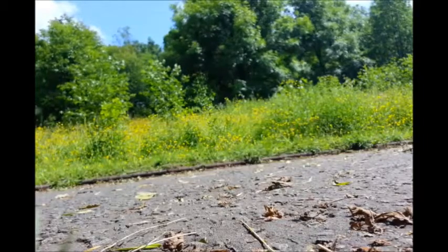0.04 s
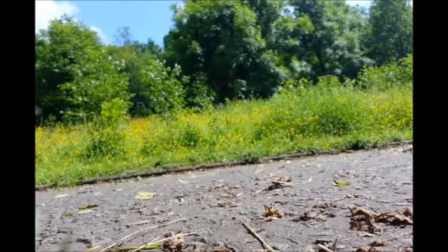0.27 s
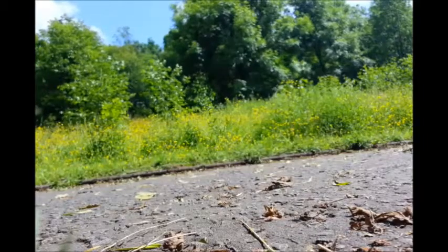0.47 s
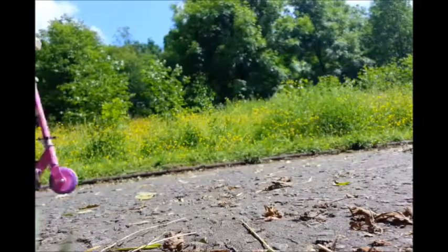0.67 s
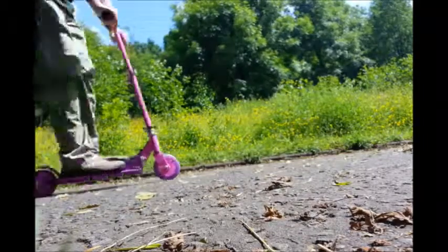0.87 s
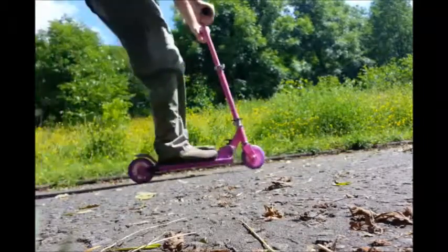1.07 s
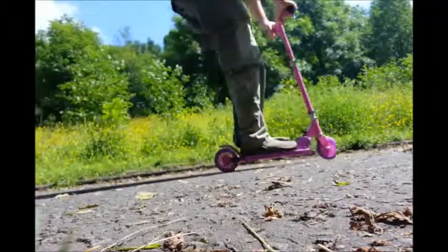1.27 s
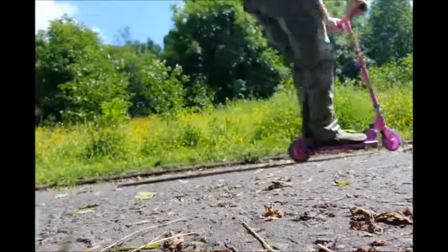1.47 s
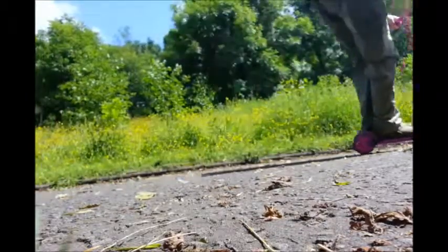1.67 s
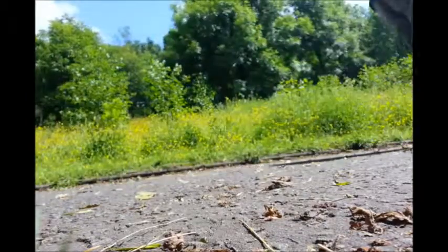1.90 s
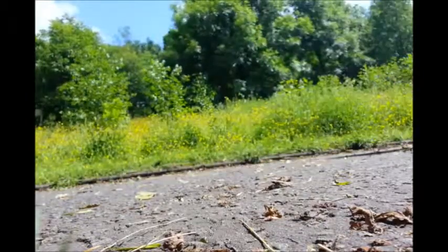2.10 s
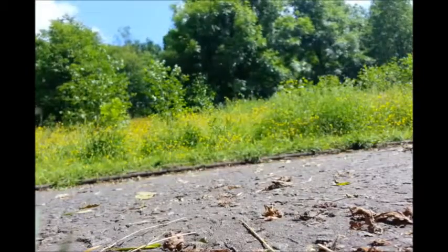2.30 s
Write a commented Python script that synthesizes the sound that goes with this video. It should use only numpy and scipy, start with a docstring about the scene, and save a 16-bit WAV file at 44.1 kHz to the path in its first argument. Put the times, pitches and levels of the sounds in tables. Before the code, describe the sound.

A kick scooter rolls by close, its wheels crackling over grit and its loose frame clattering.

```python
"""A kick scooter rolls past, right to left, on rough asphalt, close to a microphone pair near the ground. Its
small hard wheels rumble, crunch through patches of grit and jolt over stones. Each jolt makes the loose frame
clack, the deck ring and the wheels thud; some strong jolts add a hollow knock of the loose steering joint.
Faint open-air noise lies behind."""
import sys
import numpy as np
from scipy import signal
from scipy.fft import rfft, irfft, next_fast_len
from scipy.io import wavfile
from scipy.ndimage import uniform_filter1d, map_coordinates

SR = 44100
rng = np.random.default_rng(int(sys.argv[2]) if len(sys.argv) > 2 else 0)


def transcribe(signal):
    """Save signal, clipped to [-1, 1], as a 16-bit WAV file at the path in sys.argv[1]."""
    frames = np.atleast_2d(signal).T
    limited = np.clip(frames, -1, 1)
    pcm = np.round(limited * 32767).astype(np.int16)
    wavfile.write(sys.argv[1], SR, pcm)


N = 108045
TIME_S, FFT_SIZE = np.arange(N) / SR, next_fast_len(N + 8192, True)
FREQS_HZ = np.maximum(np.arange(FFT_SIZE // 2 + 1) * SR / FFT_SIZE, 1)
IMPACT_RISE_S = 0.0007

# jolts over stones: start_s, clack_db, deck_db, thud_db, ping_hz
JOLTS = [(0.1734, -11.5, -32, -47, 4240), (0.2672, -16, -42, -40, 6120), (0.3876, -7.5, -37, -21, 7750),
         (0.5461, -15, -31, -25.5, 6500), (0.591, -5, -22, -29, 6120), (0.6646, -7, -47, -40, 5850),
         (0.6918, -8, -47, -41, 6210), (0.74, -8.5, -25, -47, 7080), (0.7858, -2, -23, -33, 6030),
         (0.8156, -4.5, -30, -26.5, 6220), (0.878, -12, -27, -48, 7800), (0.8994, -7, -22, -28.5, 3100),
         (0.9113, -4.5, -24.5, -37, 3120), (0.9444, -8, -46, -32, 7150), (0.9863, -14, -20.5, -38, 5300),
         (0.9946, -3.5, -25, -35, 5230), (1, -8, -24, -51, 5300), (1.0088, -14, -27, -47, 7000),
         (1.026, -15, -43, -42, 5060), (1.0441, -11, -40, -32, 5570), (1.07, -3, -22, -22, 6240),
         (1.0834, -7.5, -22, -37, 5000), (1.1178, -4.5, -28, -28, 6540), (1.1408, -7, -31, -33, 7200),
         (1.154, -10.5, -28, -35, 6630), (1.1973, -4.5, -26.5, -28, 6530), (1.2156, -11.5, -27, -27, 6360),
         (1.2311, -8, -29.5, -32, 4600), (1.276, -9, -25.5, -36, 6570), (1.3412, -15, -25.5, -32.5, 3700),
         (1.3871, -20, -24.5, -33, 5440), (1.4306, -10, -30, -30, 4040), (1.445, -12, -34, -26.5, 5200),
         (1.4562, -8, -44, -27, 6500), (1.4716, -7.5, -31, -33, 6780), (1.5345, -2.5, -24.5, -19, 6770),
         (1.5562, -8.5, -22.5, -43, 3560), (1.6207, -2, -37, -32, 6800), (1.7107, -12.5, -27.5, -30, 6730),
         (1.7851, -9, -46, -31, 6230), (1.8708, -15.5, -55, -43, 4340), (1.8993, -2, -48, -24.5, 5930),
         (1.962, -13.5, -40, -48, 5600), (1.9847, -12.5, -35.5, -36, 4450), (2.0871, -17, -38, -38, 4620),
         (2.1498, -14.5, -33, -50, 4160), (2.2477, -15, -45, -39, 4010), (2.364, -19.5, -48, -36.5, 4150),
         (2.4238, -25, -56, -42, 4020)]
# clack and knock spectrum: freq_hz, gain_db
CLACK_COLOUR = [(900, -14), (2000, 1.5), (3000, 2), (4400, 1), (5800, 4), (7100, -1), (8600, -2),
                (10500, -5), (12000, -12), (14500, -14.5), (16000, -61)]
# crushed sand spectrum: freq_hz, gain_db
SAND_COLOUR = [(3000, -6), (7000, -4), (10000, 0), (12000, -3.5), (14500, -10.5), (16000, -68)]


def from_db(db):
    """Decibels to gain."""
    return 10 ** (np.asarray(db) / 20)


def unit_rms(x):
    """Scale to rms 1."""
    return x / np.sqrt(np.mean(x ** 2) + 1e-20)


def in_time(rows):
    """Value columns of a time curve at every sample."""
    time_s, *columns = np.transpose(rows)
    return [np.interp(TIME_S, time_s, column) for column in columns]


def at_hz(points):
    """Spectrum at every FFT bin."""
    hz, value = np.transpose(points)
    return np.interp(np.log(FREQS_HZ), np.log(hz), value)


def through(x, response):
    """Filter by a frequency response."""
    return irfft(rfft(x, FFT_SIZE) * response, FFT_SIZE)[..., :N]


def minimum_phase(colour):
    """Causal response of a colour, unit power gain."""
    gain = unit_rms(from_db(at_hz(colour)))
    cepstrum = irfft(np.log(gain), FFT_SIZE)
    cepstrum[1:FFT_SIZE // 2] *= 2
    cepstrum[FFT_SIZE // 2 + 1:] = 0
    return np.exp(rfft(cepstrum))


def decay(kicks, decay_s):
    """Exponential tail on each kick."""
    return signal.lfilter([1], [1, -np.exp(-1 / (decay_s * SR))], kicks + 1e-18)


def ring(x, hz, t60_s):
    """One damped mode."""
    radius, angle = from_db(-60 / (t60_s * SR)), 2 * np.pi * hz / SR
    return signal.lfilter([np.sin(angle)], [1, -2 * radius * np.cos(angle), radius ** 2], x + 1e-18)


def steady(x, window_samples):
    """Hold the running rms at 1."""
    return x / np.sqrt(uniform_filter1d(x ** 2, window_samples, axis=-1) + 1e-9)


def grains(per_s, spread_db, decay_s):
    """Tiny random impacts as noise bursts: (common, left, right), rms 1."""
    sizes = from_db(spread_db * np.minimum(rng.exponential(1, N), 3.5))
    power = sizes ** 2 * (rng.random(N) < per_s / SR)
    bursts = np.sqrt(decay(power, decay_s)) * rng.standard_normal((3, N))
    return steady(bursts, window_samples=800)


def jolt_kicks(column, gain_db):
    """One impulse per jolt, sized by the named level column."""
    start_s, clack_db, deck_db, thud_db, _ = np.transpose(JOLTS)
    level_db = {"clack": clack_db, "deck": deck_db, "thud": thud_db}[column]
    kicks = np.zeros(N)
    np.add.at(kicks, (start_s * SR).astype(int), from_db(level_db + gain_db))
    return kicks


def microphones(sound, colour):
    """Colour (common, left, right) into stereo; lag and shading follow the scooter's direction."""
    # direction: time_s, left_lag_ms, treble_left_minus_right_db
    path = [(0, 0.42, -3), (.4, 0.38, -4.5), (.7, 0.31, -4.5), (.95, 0.22, -1), (1.22, 0.071, -3),
            (1.5, -0.12, 0.5), (1.9, -0.21, 0), (2.45, -0.33, 2.5)]
    # left-right likeness: freq_hz, common_power_share
    likeness = [(30, 0.52), (100, 0.96), (300, 1), (800, 0.81), (1600, 0.75), (2800, 0.7), (4500, 0.26),
                (7000, 0.12), (14000, 0.19)]
    # static balance: freq_hz, left_minus_right_db
    balance = [(60, -3.5), (150, -3), (350, -0.5), (800, 0), (1600, 4), (2800, 5.5), (4300, 6.5), (5500, 4),
               (7000, -9.5), (10000, -5.5), (14000, -8)]
    # depth of directional shading: freq_hz, share
    swing = [(100, 0.11), (1000, 0.091), (3000, 1), (7000, 1), (12000, 0.31)]
    lag_ms, pan_db = in_time(path)
    share, response = np.clip(at_hz(likeness), 0, 0.99), minimum_phase(colour)
    sides = np.array([[1], [-1]])
    common = through(sound[0], response * np.sqrt(share))
    shift_samples = lag_ms / 1000 * SR / 2
    pair = np.array([map_coordinates(common, [np.arange(N) - side * shift_samples]) for side in (1, -1)])
    pair += through(sound[1:], response * np.sqrt(1 - share))
    pair = through(pair, from_db(sides * at_hz(balance) / 2))
    return pair + through(pair, at_hz(swing)) * (from_db(sides * pan_db / 2) - 1)


def pebbles(per_s=520, spread_db=1.0, low_hz=2500, high_hz=8200, pitches=24, t60_cycles=31):
    """Stone chips snap under the wheel, each with a short ping; rms 1."""
    hits = rng.random(N) < per_s / SR
    sizes = from_db(spread_db * np.minimum(rng.exponential(1, N), 3))
    snaps = hits * sizes * rng.choice([-1, 1], (3, N))
    pitch_index = rng.integers(0, pitches, N)
    return unit_rms(sum(ring(snaps * (pitch_index == k), hz, t60_cycles / hz)
                        for k, hz in enumerate(np.geomspace(low_hz, high_hz, pitches))))


def grit(roll_gain_db=-2.5, patch_gain_db=-1.5, pebble_db=-5, attack_s=0.002, release_s=0.0055):
    """Grit, chips and sand crackle under the wheels, louder in coarse patches and climbing a stone."""
    # fine grit: time_s, level_db
    roll_level = [(0, -41), (.07, -53.5), (.12, -40.5), (.4, -34.5), (.51, -41), (.6, -30), (.72, -36),
                  (.85, -28.5), (1.1, -29.5), (1.3, -34.5), (1.5, -30.5), (1.6, -41), (1.66, -33.5),
                  (1.9, -39.5), (2.06, -41.5), (2.45, -47.5)]
    # coarse patches: start_s, length_s, level_db
    patches = [(0.078, 0.066, -37), (0.172, 0.048, -32.5), (0.264, 0.007, -29.5), (0.31, 0.029, -32.5),
               (0.346, 0.089, -31), (0.469, 0.02, -35.5), (0.531, 0.048, -30.5), (0.58, 0.04, -32.5),
               (0.628, 0.019, -26), (0.662, 0.015, -28), (0.688, 0.018, -30), (0.736, 0.036, -27),
               (0.787, 0.043, -25.5), (0.869, 0.025, -24), (0.903, 0.012, -19.5), (0.913, 0.043, -25.5),
               (0.979, 0.031, -23), (1.057, 0.045, -24), (1.144, 0.015, -28.5), (1.173, 0.07, -29.5),
               (1.328, 0.024, -29), (1.373, 0.023, -30), (1.415, 0.086, -32.5), (1.528, .016, -23.5),
               (1.552, 0.024, -32), (1.686, 0.064, -30.5), (1.812, 0.027, -28), (1.946, 0.056, -36),
               (1.981, 0.045, -31), (2.101, 0.014, -35.5), (2.133, 0.018, -33)]
    # sand ticks, strongest on the approach: time_s, re_grit_db
    sand_level = [(0, 0), (.5, -2), (.55, 2), (.61, -11), (1.0, -19), (1.55, -12.5), (1.8, -30)]
    # grit spectrum: freq_hz, gain_db
    grit_colour = [(900, -35.5), (1900, -3), (2700, -6.5), (3600, -4), (5000, -2.5), (6200, -1.5),
                   (7200, -0.5), (8600, -7), (10500, -11.5), (12000, -17), (14500, -29), (16000, -63)]
    power = from_db(roll_gain_db + in_time(roll_level)[0]) ** 2
    for start_s, length_s, level_db in patches:
        attack = np.clip((TIME_S - start_s) / attack_s, 0, 1)
        release = np.exp(-np.maximum(TIME_S - start_s - length_s, 0) / release_s)
        power += (from_db(patch_gain_db + level_db) * attack * release) ** 2
    climbs = decay(jolt_kicks("clack", gain_db=-25)[::-1], decay_s=0.0029)[::-1]  # swell into each jolt
    level = np.sqrt(power + climbs ** 2)
    crunch = grains(per_s=1500, spread_db=1.2, decay_s=0.00065) + from_db(pebble_db) * pebbles()
    sand = from_db(in_time(sand_level)[0]) * grains(per_s=970, spread_db=5.0, decay_s=0.0012)
    return microphones(level * crunch, grit_colour) + microphones(level * sand, SAND_COLOUR)


def deck(rattle_gain_db=-3, modes_db=-15, far_db=-16, nearest_s=1.05, near_span_s=0.33):
    """Road and jolts shake the metal deck; its long rings stand out while it is close."""
    # rattle: time_s, level_db
    rattle_level = [(0, -40), (.07, -48.5), (.1, -32.5), (.2, -37), (.29, -36.5), (.43, -30.5),
                    (.51, -41.5), (.56, -29.5), (.72, -32), (.91, -30.5), (1.1, -32.5), (1.31, -36),
                    (1.48, -34), (1.6, -41.5), (1.72, -34), (1.86, -42.5), (2.45, -48)]
    # deck and steering tube modes: pitch_hz, gain_db
    frame_modes = [(895, -0.5), (1395, 5.5), (1635, 2), (1708, 11), (1745, 12), (2690, 6)]
    # deck spectrum: freq_hz, gain_db
    deck_colour = [(250, -16.5), (450, -5.5), (700, -6), (900, -3.5), (1100, 1), (1400, 1), (1540, 0),
                   (1710, -0.5), (1950, -3.5), (2300, -1), (3500, -16.5), (8000, -57)]
    rattle_gain = from_db(rattle_gain_db + in_time(rattle_level)[0])
    rattle = rattle_gain * grains(per_s=460, spread_db=2.5, decay_s=0.0059)
    jolt_envelope = decay(jolt_kicks("deck", gain_db=-1.5), decay_s=0.0073)
    shake = rattle + jolt_envelope * steady(rng.standard_normal((3, N)), window_samples=64)
    nearness = 1 / (1 + ((TIME_S - nearest_s) / near_span_s) ** 2)
    drive = shake * from_db(far_db * (1 - nearness))
    rings = sum(from_db(gain_db) * ring(drive, hz, t60_s=0.08) for hz, gain_db in frame_modes)
    return microphones(shake + from_db(modes_db) * np.std(shake) * unit_rms(rings), deck_colour)


def wheels(rumble_gain_db=-1.5):
    """Asphalt bumps make the loaded wheels rumble and the deck boom; each stone gives one thud."""
    # wheel rumble: time_s, level_db
    rumble_level = [(0, -44), (.055, -50), (.08, -35.5), (.12, -39.5), (.2, -32.5), (.26, -39), (.42, -34),
                    (.51, -36.5), (.56, -34), (.62, -36), (.68, -35), (.74, -37.5), (.81, -32.5),
                    (.96, -36), (1.23, -34), (1.29, -39.5), (1.46, -35), (1.6, -40.5), (2.1, -45),
                    (2.2, -51), (2.45, -54)]
    # hollow deck boom on the approach: time_s, level_db
    boom_level = [(0, -49), (.3, -49), (.41, -31), (.52, -45.5), (.615, -28.5), (.7, -41.5), (.83, -36.5),
                  (.95, -52)]
    # rumble, boom and thud spectra: freq_hz, gain_db
    rumble_colour = [(25, -56), (50, -16), (85, 0), (120, 0.5), (170, 1.5), (220, -7), (290, -4.5),
                     (400, -9), (700, -11.5), (2000, -60)]
    boom_colour = [(120, -29), (230, -7.5), (285, -1.5), (335, -7), (430, -20.5), (1200, -42)]
    thud_colour = [(30, -24), (70, -14.5), (110, -7), (175, 0), (250, -3.5), (350, -20), (700, -25.5),
                   (2000, -27)]
    rumble_gain = from_db(rumble_gain_db + in_time(rumble_level)[0])
    rumble = rumble_gain * grains(per_s=300, spread_db=1.5, decay_s=0.0049)
    boom = from_db(in_time(boom_level)[0]) * steady(rng.standard_normal((3, N)), window_samples=64)
    thuds = np.outer([1, 0, 0], jolt_kicks("thud", gain_db=22.5))
    return (microphones(rumble, rumble_colour) + microphones(boom, boom_colour)
            + microphones(thuds, thud_colour))


def air(level_db=-45.5, drift_db=0.4, drift_hz=10):
    """Faint outdoor noise, its level wavering slightly."""
    # background spectrum: freq_hz, gain_db
    air_colour = [(25, -17), (90, -4.5), (300, -5.5), (700, -2.5), (1500, -16.5), (4000, -11), (7000, -21),
                  (11000, -21), (16000, -98)]
    drift = unit_rms(through(rng.standard_normal(N), 1 / (1 + (FREQS_HZ / drift_hz) ** 2)))
    noise = through(rng.standard_normal((2, N)), minimum_phase(air_colour))
    return from_db(level_db + drift_db * drift) * noise


def clacks(crack_db=-9, crack_s=0.0018, tail_db=-11, tail_s=0.0064,
           ping_db=-12, ping_t60_s=0.018, tick_db=-14.5, tick_s=0.00007):
    """Each jolt: a bright tick of crushed stone, a crack with a noisy tail and a brief ping."""
    # ping partials: pitch_ratio, gain_db
    ping_modes = [(.78, -7.5), (1, -0.5), (1.27, -7.5)]
    cracks, ticks = np.zeros((2, 3, N + SR))
    t = np.arange(2400) / SR
    rise = np.minimum(t / IMPACT_RISE_S, 1)
    tail = from_db(tail_db) * np.exp(-t / tail_s)
    crack_envelope = from_db(crack_db) * rise * (np.exp(-t / crack_s) + tail)
    ping_envelope = rise * from_db(ping_db - 60 * t / ping_t60_s)
    for start_s, level_db, _, _, ping_hz in JOLTS:
        crack_noise, tick_noise = rng.standard_normal((2, 3, len(t)))
        ping = sum(from_db(gain_db) * np.sin(2 * np.pi * (ratio * ping_hz * t + rng.random((3, 1))))
                   for ratio, gain_db in ping_modes)
        span = int(start_s * SR) + np.arange(len(t))
        cracks[:, span] += from_db(level_db) * (crack_envelope * crack_noise + ping_envelope * ping)
        ticks[:, span] += from_db(level_db + tick_db) * np.exp(-t / tick_s) * tick_noise
    return microphones(cracks[:, :N], CLACK_COLOUR) + microphones(ticks[:, :N], SAND_COLOUR)


def steering_knocks(t60_s=0.05):
    """Some strong jolts knock the loose steering joint with a brief hollow ring, each at its own pitch."""
    # hollow knocks: start_s, level_db, pitch_hz
    strikes = [(0.9962, -12.5, 1464), (1.0, -10.5, 877), (1.089, -17, 1306), (1.141, -13.5, 1406),
               (1.195, -17, 1705), (1.275, -19, 1734), (1.436, -12.5, 605), (1.472, -17.5, 1418),
               (1.899, -26, 2950)]
    rings = np.zeros(N)
    for start_s, level_db, pitch_hz in strikes:
        t = np.maximum(TIME_S - start_s, 0)
        envelope = np.minimum(t / IMPACT_RISE_S, 1) * from_db(level_db - 60 * t / t60_s)
        rings += envelope * np.sin(2 * np.pi * pitch_hz * t)
    return microphones(np.outer([1, 0, 0], rings), CLACK_COLOUR)


def scene():
    """Passing scooter over the background."""
    return grit() + clacks() + steering_knocks() + deck() + wheels() + air()


def record(dry):
    """Soft clip, then steep low-pass."""
    ceiling, stopband_hz = 1.3, 16300
    lowpass = signal.cheby2(14, 70, stopband_hz, fs=SR, output="sos")
    return signal.sosfilt(lowpass, ceiling * np.tanh(dry / ceiling))


dry = scene()
out = record(dry)
transcribe(out)
```